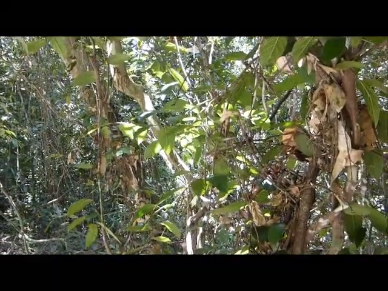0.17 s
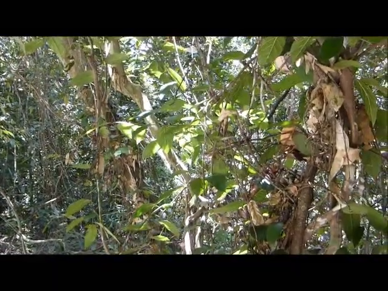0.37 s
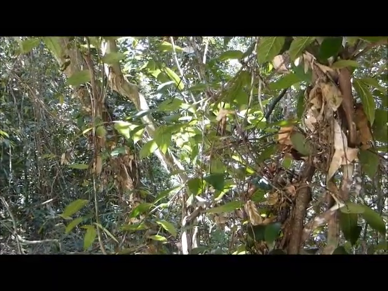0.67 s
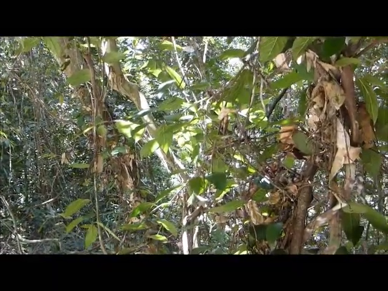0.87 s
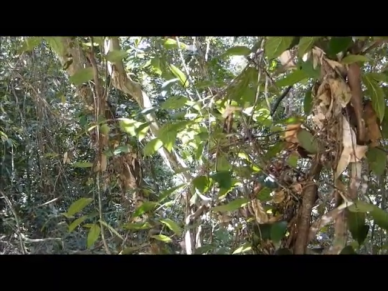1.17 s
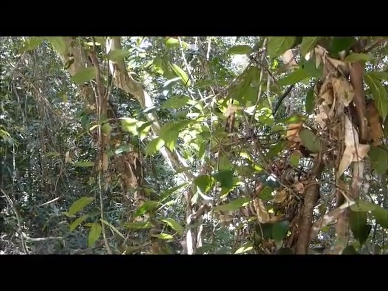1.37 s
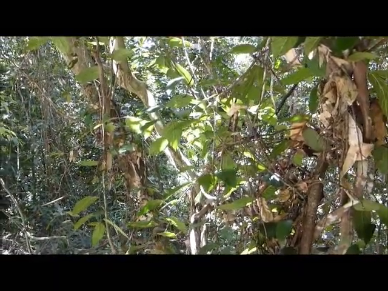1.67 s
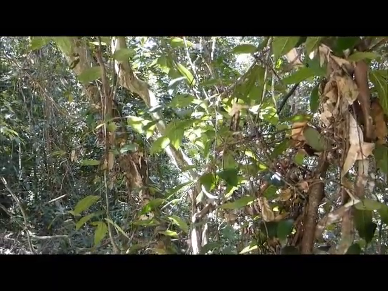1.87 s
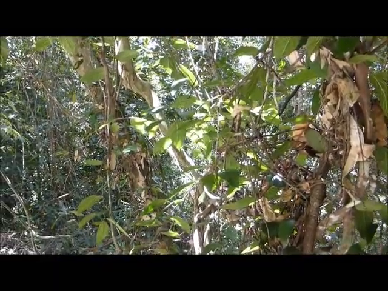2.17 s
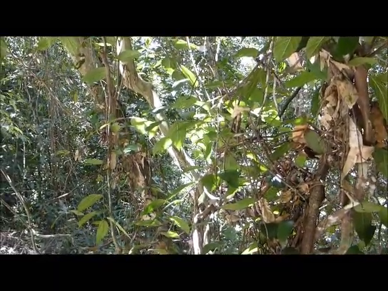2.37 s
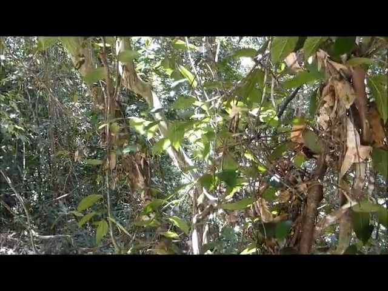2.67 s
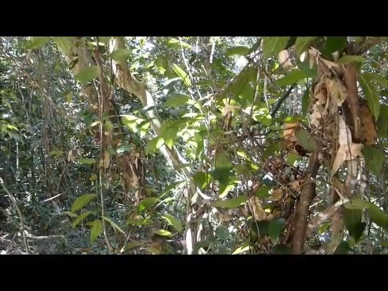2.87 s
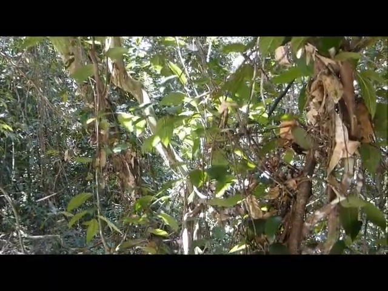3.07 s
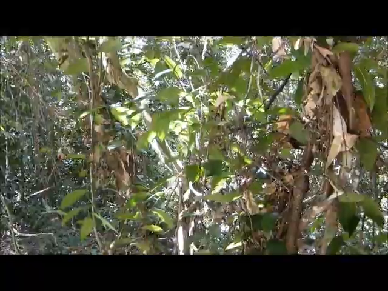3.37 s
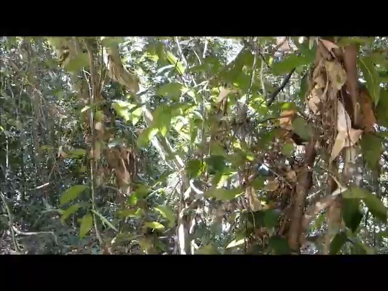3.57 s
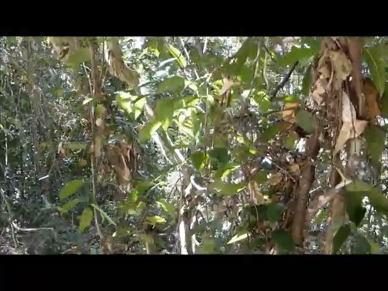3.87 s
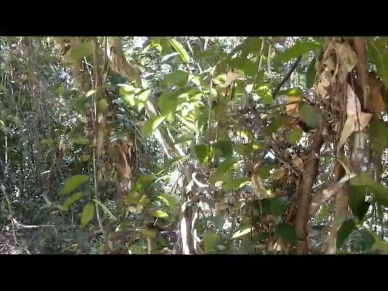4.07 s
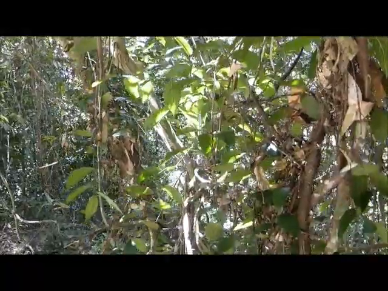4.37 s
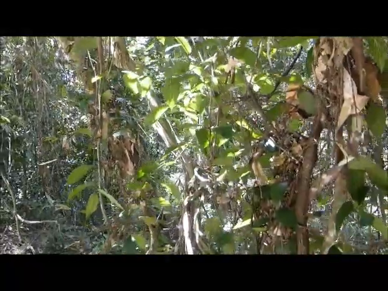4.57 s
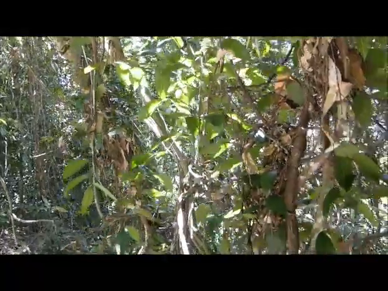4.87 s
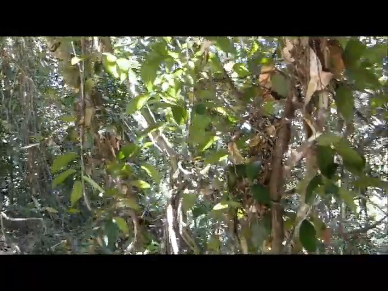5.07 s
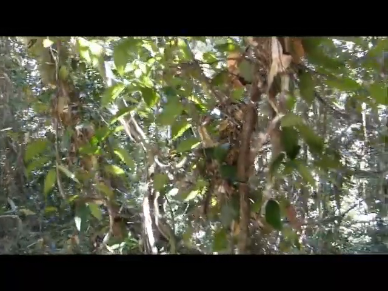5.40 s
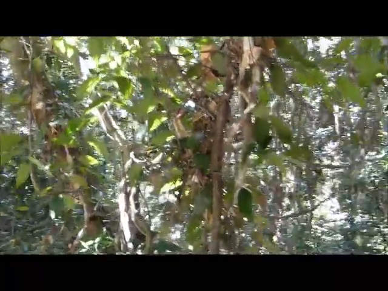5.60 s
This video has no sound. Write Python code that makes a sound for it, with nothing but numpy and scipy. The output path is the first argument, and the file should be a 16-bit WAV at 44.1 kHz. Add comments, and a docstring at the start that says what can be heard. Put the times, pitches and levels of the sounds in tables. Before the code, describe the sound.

One very loud cicada close by throbs in rasping, buzzing phrases, each ending in a falling whine, over a distant cicada drone in forest.

```python
"""Rainforest: a large cicada close by throbs in phrases that slow down, stop and restart with a falling whine.
Muscle pulls buckle its ribs: bursts of click harmonics plus scraping noise; the whine is unbroken clicking.
Dove-like hoots are gliding sines; four distant cicadas drone as blurred click trains.
Scattered echoes return from the trees; faint air noise and a swelling low rumble are filtered noise."""
import sys
import numpy as np
from scipy import signal
from scipy.fft import rfft, irfft, next_fast_len
from scipy.io import wavfile
from scipy.ndimage import uniform_filter1d

SR = 44100
rng = np.random.default_rng(int(sys.argv[2]) if len(sys.argv) > 2 else 0)


def store_pcm(level_fs):
    """Save levels as 16-bit WAV."""
    pcm = np.round(np.clip(level_fs, -1, 1) * 32767).astype(np.int16)
    wavfile.write(sys.argv[1], SR, np.atleast_2d(pcm).T)


N = 253134  # samples


def gain_of(db):
    """Decibels to amplitude gain."""
    return 10 ** (np.asarray(db) / 20)


def evened(x):
    """Scales to rms 1."""
    return x / np.sqrt(np.mean(x ** 2) + 1e-20)


def read(points, hz):
    """Interpolates a spectrum table on a log-frequency axis."""
    f, value = np.transpose(points)
    return np.interp(np.log(hz + 1), np.log(f + 1), value)


def curves(rows):
    """Interpolates every column of a table over time, sample by sample."""
    s, *columns = np.transpose(rows)
    return [np.interp(np.arange(N) / SR, s, c) for c in columns]


def wander(seconds):
    """Twice-averaged noise of rms 1; each average spans the given time."""
    size = max(round(seconds * SR), 2)
    noise = rng.standard_normal(N)
    return evened(uniform_filter1d(uniform_filter1d(noise, size), size))


def coloured(x, db_at):
    """Filters by a gain in dB given as a function of frequency."""
    size = next_fast_len(N)
    gain = gain_of(db_at(np.fft.rfftfreq(size, 1 / SR)))
    return irfft(rfft(x, size) * gain, size)[..., :N]


def bells_db(rows, hz):
    """Sum of bell-shaped resonances (+dB) and dips (-dB)."""
    return sum(db * np.exp(-((hz - f) / width) ** 2) for f, width, db in rows)


def colour(first, second=None, blend=0, treble_db=0):
    """Gains of the harmonics, blended between two tables, with total power 1."""
    gains = []
    for (k, a), (_, b) in zip(first, second or first):
        tilt_db = treble_db * (k > 9.5)  # treble: harmonic 10 and up
        gains.append(gain_of(a + (b - a) * blend + tilt_db))
    total = np.sqrt(sum(g ** 2 for g in gains) / 2)
    return [g / total for g in gains]


def ribs(hz, gains, drift, jitter, flutter_db):
    """A train of rib clicks as its harmonics; uneven timing blurs the upper ones most."""
    turns = np.cumsum(hz * (1 + drift * wander(0.00409))) / SR + jitter * wander(0.00077)
    out = np.zeros(N)
    for k, gain in enumerate(gains, 1):
        flutter = gain_of(flutter_db * np.sqrt(k / len(gains)) * wander(0.004))
        phase = 2 * np.pi * (k * turns + 0.0208 * k * k)
        out += gain * flutter * np.cos(phase)
    return out


def rasp():
    """Scraping between the click harmonics: coloured noise of rms 1."""
    # scraping spectrum: f/Hz, relative level/dB per Hz
    rasp_spectrum = [(400, -60), (700, -34), (1050, -22), (1400, -28), (1900, -8), (2300, -13), (2900, -4),
                     (3400, -5), (4700, -4), (6100, -7), (7400, -6), (9000, -8), (12500, -5), (16000, -12)]
    return evened(coloured(rng.standard_normal(N), lambda hz: read(rasp_spectrum, hz)))


def hump(rise_ms, fall_ms, power):
    """The swell of one pull, top in the middle."""
    t_ms = np.arange(-600, 601) / SR * 1000
    return np.exp(-abs(t_ms / np.where(t_ms < 0, rise_ms, fall_ms)) ** power)


def pull_train():
    """One impulse per muscle pull; groups of four lengthen with the square of the way through their run."""
    # runs of like groups, each lasting until the next row; within a phrase the groups tend to grow:
    # first pull t/s, groups, pulls per group, first spacing/ms, first level/dB, last level/dB (relative)
    runs = [(0.016, 3.63, 3, 10.5, -20.5, -19.5), (.179, 2, 3, 11.5, -20, -19.5),
            (.258, 8.01, 4, 11.5, -19.5, -21.5), (.679, 0.97, 1, 0, -19.5, -19.5),
            (0.952, 4.52, 2, 10.5, -18, -19), (1.102, 4, 3, 11, -19.5, -20), (1.265, 23, 3, 10.5, -20, -20),
            (2.222, 3, 3, 10.5, -20, -19), (2.338, 8.67, 4, 11.8, -19, -20.5),
            (2.761, 0.89, 1, 0, -20.5, -19.5), (3.017, 3.82, 2, 12.5, -18.5, -18),
            (3.147, 21, 3, 10, -20, -20), (4.027, 6, 3, 11, -19.5, -20.5), (4.274, 4.04, 3, 10.5, -20, -20),
            (4.431, 6.44, 4, 11.5, -20, -21), (4.749, 1.19, 3, 14.5, -21, -20),
            (5.057, 4.76, 2, 11.5, -17.7, -16.5), (5.211, 12, 3, 10, -17, -19.5),
            (5.713, 1, 3, 10.5, -18.5, -19)]
    slowing = 0.31  # share by which the last group of four outlasts the first
    hurry_ms, timing_ms, level_spread_db = 0.69, 0.3, 0.43
    pulls = np.zeros(N)
    for (first, groups, count, ms, first_db, last_db), after in zip(runs, runs[1:] + runs[-1:]):
        groups, k = round(groups), np.arange(round(count))
        way = np.linspace(0, 1, groups)[:, None]
        stretch = 1 + slowing * (len(k) == 4) * way ** 2
        starts = first + (after[0] - first) * (np.cumsum(stretch, axis=0) - stretch) / stretch.sum()
        luck = rng.standard_normal((groups, len(k), 2))
        early = (k == 1) * (len(k) == 3)  # in a triplet the second pull hurries
        at = starts + (k * ms * stretch - hurry_ms * early + timing_ms * luck[..., 0]) / 1000
        level_db = first_db + (last_db - first_db) * way + level_spread_db * luck[..., 1]
        pulls[np.round(at * SR).astype(int)] += gain_of(level_db)
    return pulls


def belly():
    """Click rate, slackness, treble and spring-back: the belly tightens as a phrase opens, slackens at its close."""
    # phrases: start t/s, end t/s, click rate before sag f/Hz, base treble/dB, base spring-back/dB
    phrases = [(-1.2, .7, 931, -4.5, -5.5), (.945, 2.78, 933, 0, -5.2), (3.01, 4.8, 931, -2.5, -4.8),
               (5.05, 6.9, 940, -5, -5.5)]
    # tightening: t after start/s, slackness 0-1, added treble/dB, added spring-back/dB
    opening_rows = [(0, .3, -2, -3), (.15, 0, -2, 0), (0.598, .06, 1, -0.3), (1., 0.17, 0.5, -0.6)]
    # slackening: t before end/s, slackness 0-1, added treble/dB, added spring-back/dB
    closing_rows = [(0, 0.75, -4, -8), (.16, 0.85, 2, -2.5), (.27, .16, 1, 0.5), (.45, 0, 0, 0.5)]
    sag_hz = 29.91  # click rate lost at closing slackness 1
    t, out = np.arange(N) / SR, np.zeros((4, N))
    after, *opening = np.transpose(opening_rows)
    before, *closing = np.transpose(closing_rows)
    for start, end, hz, treble_db, spring_db in phrases:
        slack, treble, spring = [np.interp(t - start, after, a) + np.interp(end - t, before, b)
                                 for a, b in zip(opening, closing)]
        slack = np.clip(slack, 0, 1.3)
        rate_hz = hz - sag_hz * np.interp(end - t, before, closing[0]) ** 1.5
        now = t > start - .1  # each phrase overwrites the one before
        out[:, now] = np.array([rate_hz, slack, treble_db + treble, spring_db + spring])[:, now]
    return out


def buzz():
    """Each pull buckles the ribs in a burst of clicks; they spring back faster and softer."""
    # click harmonics, belly taut: multiple, relative level/dB
    taut = [(1, -15.5), (2, -2.5), (3, 1.5), (4, -0.5), (5, 1), (6, -10), (7, -5.5), (8, 3), (9, 3.5),
            (10, -8), (11, -7.5), (12, 2.5), (13, 6), (14, 4), (15, -10), (16, -5)]
    # click harmonics, belly slack: multiple, relative level/dB
    slack_harmonics = [(1, -10), (2, 5), (3, 3.5), (4, 1.5), (5, 1), (6, 0), (7, -15.5), (8, 0), (9, -0.5),
                       (10, 1.5), (11, -1), (12, -10), (13, -3.5), (14, -7.5), (15, -5), (16, -22)]
    # spring-back harmonics: multiple, relative level/dB
    spring_harmonics = [(1, -14.5), (2, -11), (3, 4), (4, -3), (5, -12), (6, -7.5), (7, -3), (8, -10),
                        (9, 6), (10, -3), (11, -8.5), (12, -21), (13, -8), (14, -43), (15, -64), (16, -38)]
    back_delay_s, slip_lead_s = 0.0044, 0.0038
    pulls = pull_train()
    hz, slack, treble_db, spring_db = belly()
    inward = signal.oaconvolve(pulls, hump(2.8, 3.3, 2.8), "same")
    back = signal.oaconvolve(pulls, hump(2.6, 3.6, 2.2), "same")
    back = np.roll(back, round(back_delay_s * SR))
    back_share = (back ** 6 + 1e-20) / (back ** 6 + inward ** 6 + 1e-20)  # 1 where spring-back dominates
    quicker = 1 + (.06 - .03 * slack) * back_share
    back = back * gain_of(spring_db)
    inward_gains = colour(taut, slack_harmonics, slack, treble_db)
    gains = [inward * a + back * b for a, b in zip(inward_gains, colour(spring_harmonics))]
    # every pull starts its clicks afresh: the beat slips by a random part of a turn just before it
    slip_hz = uniform_filter1d((pulls > 0) * rng.uniform(-.5, .5, N), 70) * SR
    slip_hz = np.roll(slip_hz, -round(slip_lead_s * SR))
    clicks = ribs(hz * quicker + slip_hz, gains, drift=.003, jitter=.005, flutter_db=1.8)
    scrape = gain_of(-8 - 2 * slack) * (inward + .5 * back) * rasp()
    return gain_of(0.5) * (clicks + scrape)


def whine():
    """Unbroken clicking that slides down; the colour turns as it falls."""
    # held whines: start t/s, end t/s, base level/dB, first click rate f/Hz, last click rate f/Hz
    whines = [(0.75, 0.942, -20, 945.7, 852), (2.83, 3.005, -19.5, 944, 858),
              (4.856, 5.045, -19.5, 948, 851.3)]
    # course they share: share of length, level offset/dB, share of slide, treble/dB
    slide = [(0, 0.1, 0.019, -7), (.15, -1, .03, -2.5), (.5, -2.5, .5, -5), (.88, -4, .96, 0),
             (1, -4.6, 1, -3)]
    # click harmonics, whine high: multiple, relative level/dB
    high_harmonics = [(1, -17), (2, -4.5), (3, 1), (4, -4), (5, -2), (6, -5.5), (7, -12.5), (8, -1),
                      (9, -2), (10, -2), (11, -8.5), (12, -9), (13, -6), (14, -4), (15, -15), (16, -26)]
    # click harmonics, whine low: multiple, relative level/dB
    low_harmonics = [(1, -10.5), (2, 4.5), (3, 2), (4, 2), (5, 3.5), (6, 3), (7, 2), (8, -3.5), (9, -6.5),
                     (10, 2), (11, 0), (12, -3), (13, -9), (14, -14), (15, -14), (16, -14)]
    # stretched-belly bands that the harmonics slide through: f/Hz, width/Hz, boost (+) or dip (-)/dB
    belly_bands = [(1801, 44, 5.5), (1860, 27, 0.5), (2682, 78.6, -8), (3644, 74, -11), (4545, 39, -16),
                   (5440, 120, -5.5), (6491, 110, -2), (7190, 120, -12), (7740, 79, 5), (8900, 60, -19)]
    rib_count, attack_s, release_s = 5, 0.0034, 0.0057
    rows = []
    for start, end, level_db, first, last in whines:
        for share, db, slid, treble_db in slide:
            rows.append((start + share * (end - start), level_db + db, first + slid * (last - first), treble_db))
    db, hz, treble_db = curves(rows)
    t = np.arange(N) / SR
    on = sum(np.clip((t - w[0]) / attack_s, 0, 1) * np.clip((w[1] - t) / release_s, 0, 1) for w in whines)
    fallen = np.clip((930 - hz) / 60, 0, 1.2)
    gains = colour(high_harmonics, low_harmonics, fallen, treble_db)
    clicks = ribs(hz, gains, drift=0.00339, jitter=0.0047, flutter_db=2.0)
    # each pull buckles all the ribs in turn: sidebands
    pull_phase = 2 * np.pi * np.cumsum(hz) / SR / rib_count
    clicks = coloured(clicks * (1 + .22 * np.cos(pull_phase)), lambda f: bells_db(belly_bands, f))
    scrape = gain_of(-7.0 + 2.3 * wander(0.00067)) * rasp()
    return on * gain_of(db + 2.0) * (clicks + scrape)


def path_db(hz):
    """Narrow bands are cancelled by close reflections; a low cut leaves little below about 620 Hz."""
    # cancelled bands: f/Hz, width/Hz, depth/dB
    notches = [(1336, 60, -19), (1555, 63, -8.5), (2200, 26, -16), (5910, 190, -4.5), (8920, 274, -14)]
    return bells_db(notches, hz) - 10 * np.log10(1 + (620 / (hz + 1)) ** 8)


def forest(x):
    """Scattered echoes from trunks and leaves, mixed differently for each ear."""
    # decay by frequency: f/Hz, t60/s
    decay = [(500, 0.33), (2000, 0.13), (6000, 0.42), (14000, 0.18)]
    taps = np.zeros((2, SR // 2))
    # one random-sign echo in every 20 samples
    at = np.arange(130, SR // 2 - 20, 20) + rng.integers(0, 20, (2, (SR // 2 - 131) // 20))
    np.put_along_axis(taps, at, rng.choice([-1., 1.], at.shape), 1)
    hz, t, z = signal.stft(taps, SR, nperseg=256)
    decay_db = -60 * t / read(decay, hz)[:, None]
    tail = signal.istft(z * gain_of(decay_db), SR, nperseg=256)[1]
    tail = tail + 0.52 * tail[::-1]  # partly shared between the ears
    return signal.fftconvolve(x[None], tail / np.linalg.norm(tail[0]), axes=1)[:, :N]


def hoot(start, top, end, db, first_hz, top_hz, last_hz):
    """A soft, nearly pure whistle that glides to its middle pitch, then sags."""
    ends_db = -22  # level at start and end, relative to the loudest point
    t = np.arange(N) / SR
    up = np.clip((top - t) / (top - start), 0, 1)
    down = np.clip((t - top) / (end - top), 0, 1)
    hz = top_hz + (first_hz - top_hz) * up ** 2.485 + (last_hz - top_hz) * down ** 1.6
    on = np.clip((t - start) / 0.018, 0, 1) * np.clip((end - t) / 0.03, 0, 1)
    turns = np.cumsum(hz * (1 + 0.01604 * wander(0.007))) / SR
    level_db = db + ends_db * (up ** 1.2 + down ** .75) + 2.5 * wander(0.01)
    return on * gain_of(level_db) * np.sqrt(2) * np.sin(2 * np.pi * turns)


def hoots():
    """Dove-like birds: the sum of swelling and fading whistles."""
    # start t/s, loudest t/s, end t/s, relative level/dB, first f/Hz, f at loudest/Hz, last f/Hz
    hoot_rows = [(4.41, 4.535, 4.73, -39, 500, 703, 680), (5.09, 5.165, 5.29, -51, 540, 628, 560),
                 (4.48, 4.56, 4.62, -42, 890, 885, 870)]
    return sum(hoot(*row) for row in hoot_rows)


def chorus():
    """Four distant singers at nearby click rates, spread across the scene."""
    # distant click harmonics: multiple, relative level/dB
    far_harmonics = [(1, -20.5), (2, -0.5), (3, 3.5), (4, 2), (5, -6), (6, -0.5), (7, -29), (8, 4),
                     (9, -10), (10, -40), (11, -13), (12, 6.5), (13, -11), (14, -9.5), (15, -30), (16, -30)]
    # chorus level before the path filter: t/s, level/dB
    far_level = [(0, -30), (1.5, -33.5), (2.8, -32.5), (4, -32.5), (5, -32.5), (5.74, -33.5)]
    out = np.zeros((2, N))
    for hz, pan in [(934, 0.27), (923, 0.77), (930.5, 0.63), (957, 0.15)]:  # f/Hz, pan 0 left - 1 right
        song = ribs(hz * np.ones(N), colour(far_harmonics), drift=.012, jitter=0.064, flutter_db=2.5)
        sides = np.sqrt([[1 - pan], [pan]])
        out += sides * (song + gain_of(-36) * rasp()) * gain_of(3.8 * wander(0.0017))
    return gain_of(curves(far_level)[0]) * evened(out)


def air():
    """Faint low noise, plus a low rumble that swells and fades."""
    # faint noise: f/Hz, relative level/dB per Hz
    air_spectrum = [(12, -59), (20, -24), (176, -14), (248, -4), (284, -5.5), (503, -4), (696, -5),
                    (800, -19), (1040, -33), (1760, -120)]
    # faint noise course: t/s, level/dB
    air_level = [(0, -72), (.7, -67), (1.5, -75), (2.2, -73.5), (2.9, -68), (4., -73), (4.6, -67.5),
                 (5.74, -68)]
    # rumble swells: start t/s, end t/s, level before flutter/dB
    swells = [(-.1, 0.451, -74), (.52, 0.799, -72.5), (1.0, 1.35, -88), (1.651, 1.75, -80),
              (1.902, 2.05, -80), (2.149, 2.451, -84), (2.683, 3.07, -75), (3.197, 3.649, -80),
              (3.853, 4.103, -82), (4.24, 4.68, -72), (4.75, 5.15, -67), (5.199, 5.898, -76.5)]
    # rumble: f/Hz, relative level/dB per Hz
    rumble_spectrum = [(15, -30), (30, -16), (60, -16), (80, -6), (120, -4.5), (190, -5), (260, -22),
                       (500, -70)]
    ramp_s = 0.081  # ramp in and out of a swell
    t = np.arange(N) / SR
    swell = sum(gain_of(db) * np.clip(np.minimum(t - s, end - t) / ramp_s, 0, 1) for s, end, db in swells)
    a, b = rng.standard_normal((2, 3, N))
    # third noise is common to both channels
    a, b = a[:2] + 2.1 * a[2], b[:2] + 1.4 * b[2]
    faint = coloured(a, lambda hz: read(air_spectrum, hz) - 18 * (hz < 200))
    rumble = coloured(b, lambda hz: read(rumble_spectrum, hz))
    return gain_of(curves(air_level)[0]) * evened(faint) + swell * gain_of(4.2 * wander(0.064)) * evened(rumble)


def scene():
    """Near singer right of centre, its lean fading as the camera turns; echoes, birds, chorus and air."""
    # lean to the right, opposite sign on the left: f/Hz, level/dB
    side_tilt = [(500, 0.5), (1500, 3), (4000, 2), (8000, 2), (14000, 3.5)]
    # the camera turns: t/s, share of lean
    lean_course = [(0, 0.89), (4.6, 0.81), (5.2, 0.66), (5.74, 0.19)]
    # what the forest returns: f/Hz, level/dB
    echo_spectrum = [(700, -2), (2000, -10), (4000, -5.5), (8400, -2), (13000, -2)]
    near = coloured(buzz() + whine(), path_db)
    bird = hoots()
    right = coloured(near, lambda hz: read(side_tilt, hz))
    left = coloured(near, lambda hz: -read(side_tilt, hz))
    lean = curves(lean_course)[0]
    direct = near + lean * (np.array([left, right]) - near)
    echoes = forest(coloured(near, lambda hz: read(echo_spectrum, hz)) + gain_of(-10) * bird)
    birds = bird * gain_of([[-1.5], [.5]])
    return direct + echoes + birds + coloured(chorus(), path_db) + air()


def record(dry):
    """Band limit: linear-phase low-pass."""
    edge_hz = 15650
    lowpass = signal.firwin(511, edge_hz, window=("kaiser", 9), fs=SR)
    return signal.oaconvolve(dry, lowpass[None], "same")


dry = scene()
out = record(dry)
store_pcm(out)
```